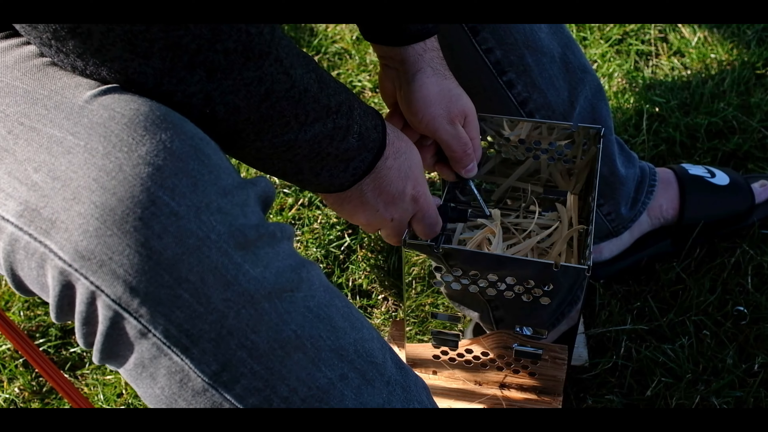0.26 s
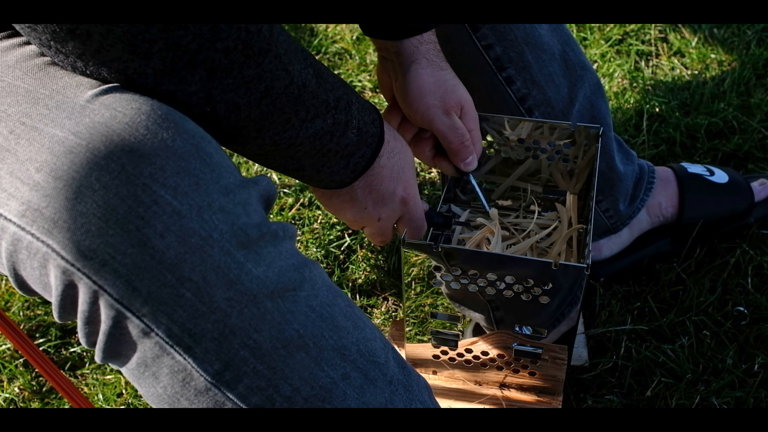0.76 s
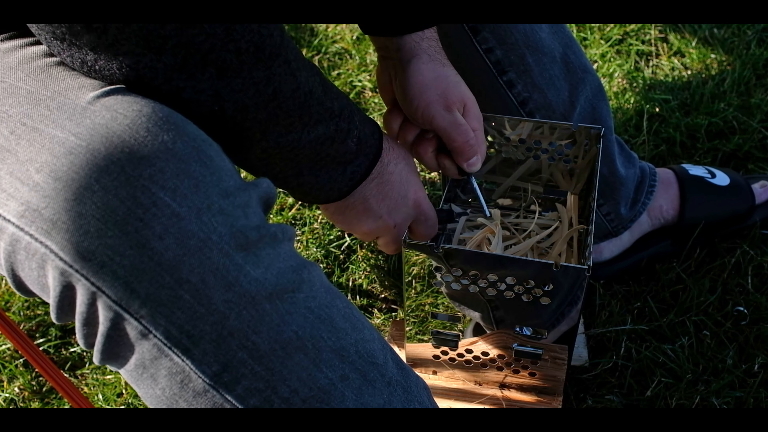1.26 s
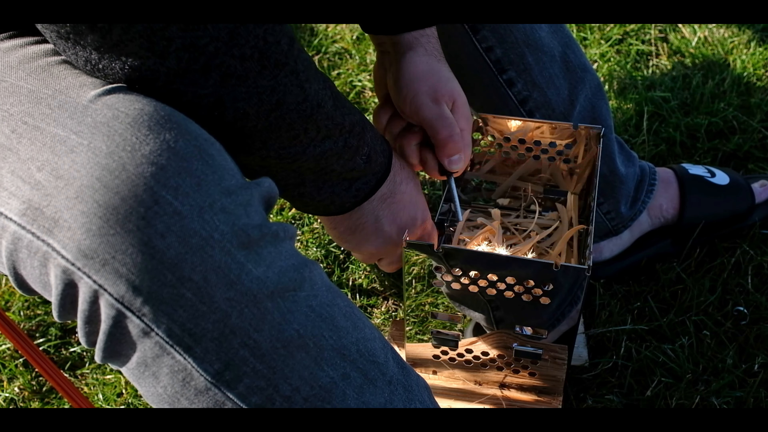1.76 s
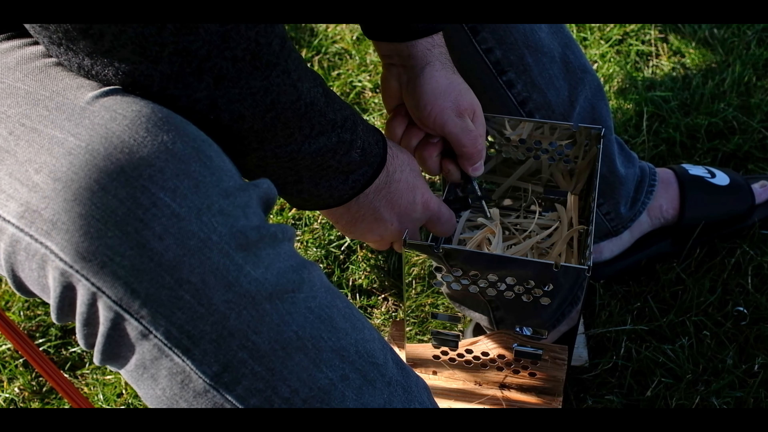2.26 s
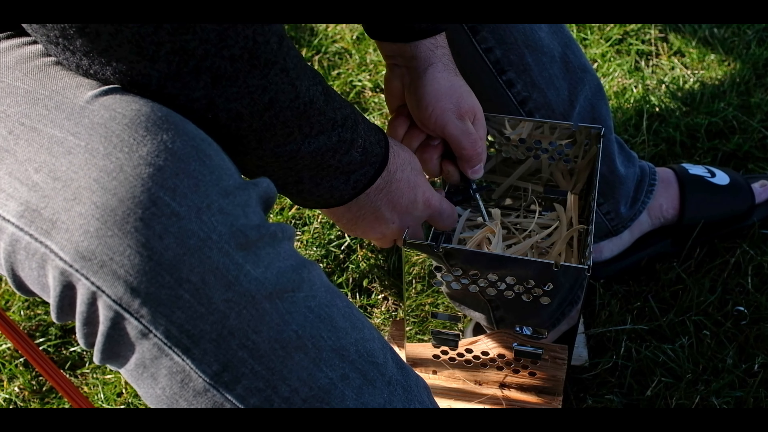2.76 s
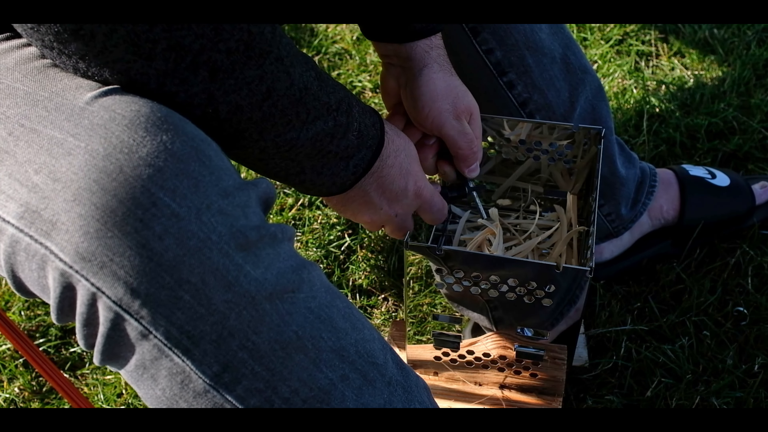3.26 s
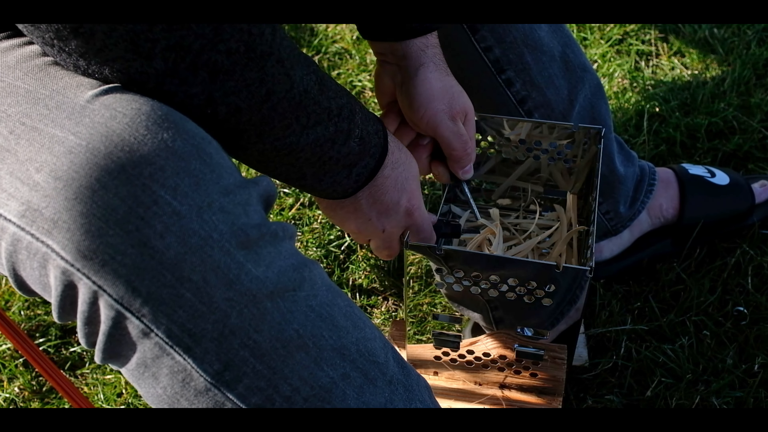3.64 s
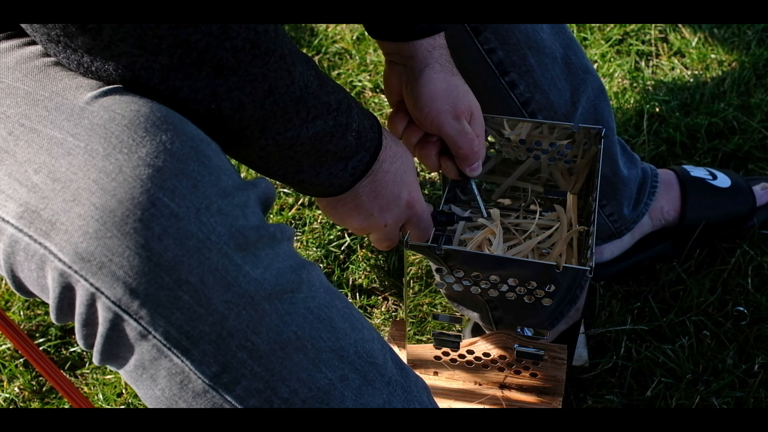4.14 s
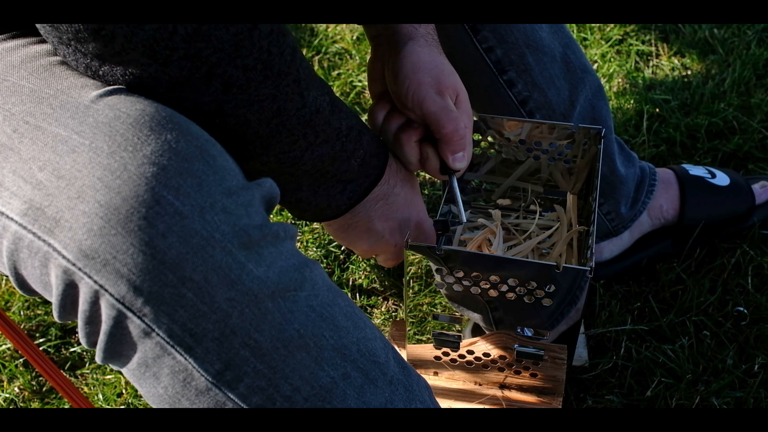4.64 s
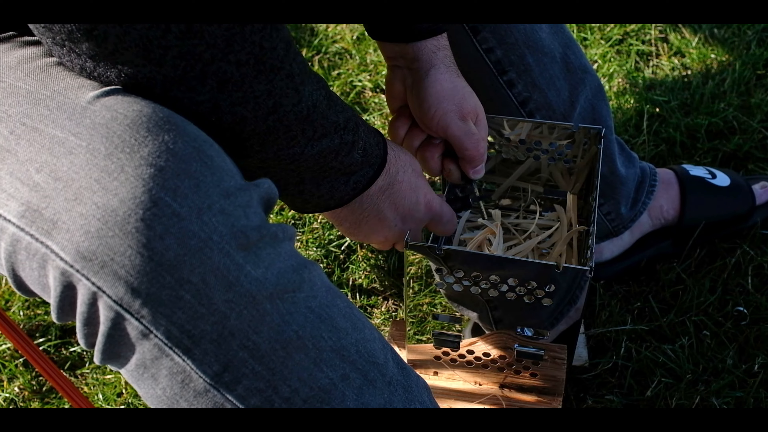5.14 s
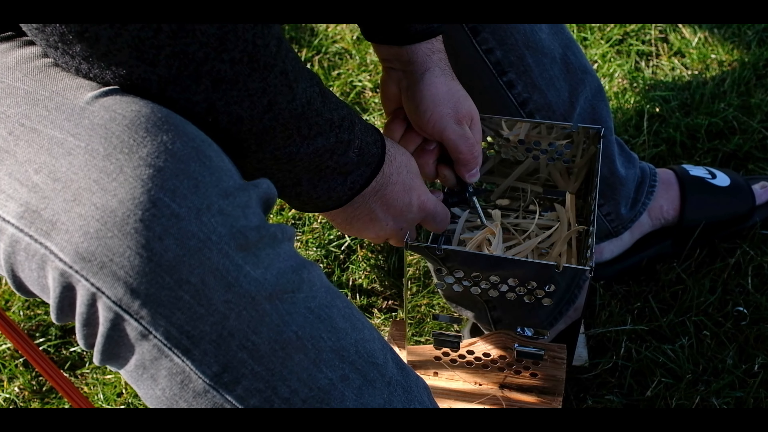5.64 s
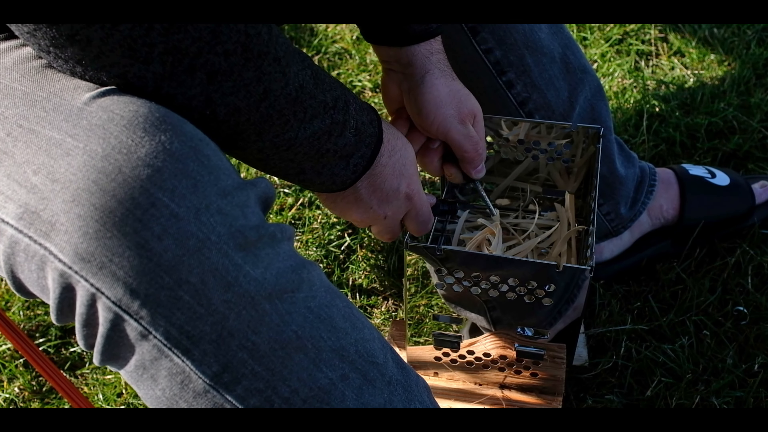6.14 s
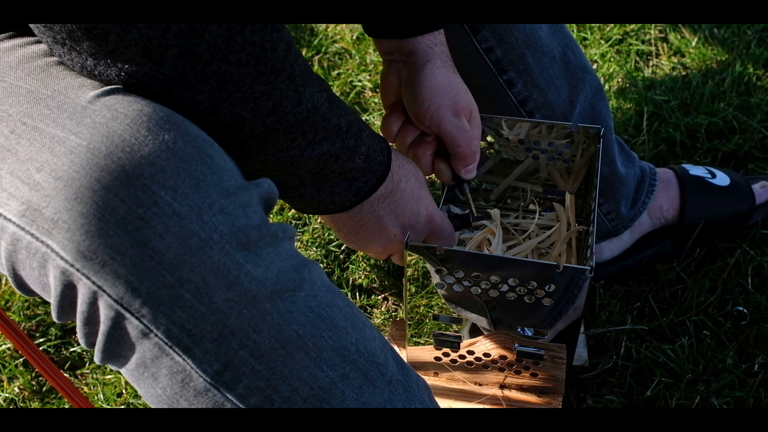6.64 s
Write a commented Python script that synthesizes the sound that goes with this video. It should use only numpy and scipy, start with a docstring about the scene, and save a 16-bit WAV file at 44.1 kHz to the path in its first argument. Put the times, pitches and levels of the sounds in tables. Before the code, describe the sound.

Gusty wind rumbles deep against the microphone in an open grassy place with faint distant sea. Nearby, hard steel scrapes down a rod in quick, bright, gritty strokes, each led by a small squeak and crack and followed by dry rustling. The striker clicks back onto the rod before the next stroke. Occasional short fizzing bursts sound boxy and metallic. At the very end a muffled thump gives way to fuller airy rush.

```python
"""Wind rumbles over a breezy field as a steel striker scrapes down a ferro rod in a sheet-steel camp stove.
In each stroke the edge skates, squeaks, bites with a crack and rasps off: stick-slip friction and fracture.
Cloth and tinder rustle, the striker clicks back onto the rod, and some spark showers crackle in the firebox.
Its walls ring faintly when knocked. One wind strength drives buffeting, eddies and a rope's note;
near the end a soft thump opens a broader rush of wind and sea."""
import sys
import numpy as np
from scipy import signal
from scipy.fft import rfft, irfft
from scipy.io import wavfile
from scipy.ndimage import uniform_filter1d

SR = 44100
rng = np.random.default_rng(int(sys.argv[2]) if len(sys.argv) > 2 else 0)


def dump(signal):
    """Clip the signal to [-1, 1] and save it as 16-bit WAV at the path in sys.argv[1]."""
    limited = np.clip(np.atleast_2d(signal).T, -1, 1)
    pcm = np.round(limited * 32767).astype(np.int16)
    wavfile.write(sys.argv[1], SR, pcm)


N = 304290
T = np.arange(N) / SR  # time, s


def undb(db):
    """Logarithmic level: decibels to amplitude gain."""
    return 10 ** (np.asarray(db) / 20)


def unit(x):
    """Power normalisation: scale to rms 1."""
    return x / np.sqrt(np.mean(x ** 2))


def white():
    """White noise: equal mean power at every frequency, rms 1."""
    return rng.standard_normal(N)


def colour(x, points, size=32768):
    """Minimum-phase filtering to a (f/Hz, level/dB) shape; white noise keeps its power."""
    hz, db = np.transpose(points)
    log_f = np.log(np.fft.rfftfreq(size, 1 / SR) + 1)
    gain = unit(undb(np.interp(log_f, np.log(hz), db)))
    # folding the cepstrum onto positive time makes the response causal
    cepstrum = irfft(np.log(gain))
    cepstrum[1:size // 2] *= 2
    cepstrum[size // 2 + 1:] = 0
    response = irfft(np.exp(rfft(cepstrum)))
    return signal.oaconvolve(x, response)[:N]


def resonate(x, modes):
    """Modal resonance: (f/Hz, width/Hz, level/dB) modes decay at pi * width; white noise keeps its power."""
    t = T[:min(len(x), SR // 10)]
    response = 0
    for hz, width, db in modes:
        decay = np.exp(-np.pi * width * t)
        response = response + undb(db) * width * decay * np.cos(2 * np.pi * hz * t)
    return signal.fftconvolve(x, response / np.linalg.norm(response))[:len(x)]


def walk(rate):
    """Slow modulation: random knots at this rate per second, joined by lines, rms 1."""
    knots = np.arange(int(N / SR * rate) + 2) / rate
    return unit(np.interp(T, knots, rng.standard_normal(len(knots))))


def grains(rate, spread_db):
    """Shot noise: tiny fractures at random moments, of uneven size and either sign, rms 1."""
    fractures = rng.random(N) < rate / SR
    signs = rng.choice([-1, 1], N)
    return unit(fractures * signs * undb(spread_db * rng.standard_normal(N)))


def contacts(times, levels_db, decay_s, modes, detune=0.041):
    """Impact excitation: a decaying burst of micro-impacts rings modes that shift with the grip."""
    out, size = np.zeros(N + SR), 2048
    t = T[:size]
    for s, db in zip(times, levels_db):
        chance = rng.standard_normal(size)
        # the last draws, nearly silent in the burst, set the shift of each mode
        gripped = [(hz + detune * min(hz, 4000) * shift, width, level)
                   for (hz, width, level), shift in zip(modes, chance[::-1])]
        hit = resonate(chance * np.exp(-t / decay_s), gripped)
        loudest = np.sqrt(uniform_filter1d(hit ** 2, size=132).max())  # rms of the loudest 3 ms
        start = int(s * SR)
        out[start:start + size] += undb(db) * hit / loudest
    return out[:N]


# strength of the wind: t/s, level/dB about its mean
WIND_STRENGTH = [(0.0, 9.5), (0.3, 10), (0.48, 3.0), (0.6, 8.0), (0.78, 1.5), (1.03, -2.5), (1.3, -1.0),
                 (1.65, 0.5), (2.08, 5.5), (2.5, 1), (3.35, 1.5), (3.7, -2.5), (4.4, -2.5), (5.05, -8.0),
                 (5.68, -5.5), (6.17, 4.5), (6.5, 3.5), (6.9, -3.5)]


def wind_strength():
    """Common drive: the strength of the wind at each moment, in dB about its mean."""
    return np.interp(T, *np.transpose(WIND_STRENGTH))


# spectral shapes of the wind, lowest first: f/Hz, level/dB per Hz
BUFFET_SHAPE = [(8, -12.5), (15, 5), (27, 2), (40, -5.5), (56, -12.5), (75, -27), (130, -51), (1000, -130)]
THRUM_SHAPE = [(35, -15), (60, 1.5), (80, -1), (110, -10.5), (160, -20), (320, -41.5), (2000, -110)]
EDDY_SHAPE = [(50, -6.5), (110, 0), (160, -2.5), (290, -9.5), (430, -12.5), (700, -24.5), (1100, -32),
              (2000, -46), (5000, -57)]
# each layer: level in the mean wind (dB), dB per dB of wind
BUFFET_DB, BUFFET_SLOPE = -15.5, 1.08
THRUM_DB, THRUM_SLOPE = -33.5, 1.16
EDDY_DB, EDDY_SLOPE = -41.5, 0.8


def wind(flurry_db=1.5, flurries_per_s=9):
    """Turbulent pressure: gusts buffet the microphone; finer eddies thrum and flutter above the rumble."""
    strength = wind_strength()
    gusts = strength + flurry_db * walk(flurries_per_s)
    rumble = colour(white(), BUFFET_SHAPE)
    rumble /= np.sqrt(uniform_filter1d(rumble ** 2, size=9000))  # the gusts alone set its slow swell
    buffet = rumble * undb(BUFFET_DB + BUFFET_SLOPE * gusts)
    thrum = colour(white(), THRUM_SHAPE) * undb(THRUM_DB + THRUM_SLOPE * gusts)
    eddies = colour(white(), EDDY_SHAPE) * undb(EDDY_DB + EDDY_SLOPE * strength + 1.2 * walk(25))
    return buffet + thrum + eddies


ROPE_DB, ROPE_SLOPE = -58.5, 0.71  # drive in the mean wind (dB), dB per dB of wind
ROPE_HZ, ROPE_CLIMB = 827, .45  # centre note in the mean wind (Hz), power law of its climb
ROPE_RANGE_DB = 6  # the range of wind that the note follows


def rope():
    """Vortex shedding: a guy rope's faint, breathy, wavering note climbs and swells with the wind."""
    drive_db = ROPE_RANGE_DB * np.tanh(wind_strength() / ROPE_RANGE_DB)
    hz = ROPE_HZ * undb(ROPE_CLIMB * drive_db) * (1 + .035 * walk(12))
    flutter = colour(white(), [(25, 0.5), (70, -9.5), (200, -25.5), (2000, -86.5)])
    note = np.cos(2 * np.pi * np.cumsum(hz) / SR)
    return flutter * undb(ROPE_DB + ROPE_SLOPE * drive_db) * note


# distant sea and wind in the grass: f/Hz, level/dB per Hz
FIELD_SHAPE = [(60, -1.5), (250, 1.5), (500, -13), (800, -14), (1400, -16), (2200, -22), (4000, -29),
               (5400, -28), (6200, -29), (7500, -30.5), (11000, -40), (15000, -38.5)]


def field():
    """Distributed sources: distant sea and wind in the grass merge into slowly varying noise."""
    return colour(white(), FIELD_SHAPE) * undb(-49.5 + .7 * walk(2.94))


# strokes down the rod: start t/s, squeak t/s, bite t/s, end t/s,
# then relative rasp level/dB, edge ring level/dB, squeak level/dB, bite crack level/dB
STROKES_DOWN_ROD = [(.006, .006, .007, .031, -29.5, -30, -36, -27),
                    (.548, .567, .589, .69, -34, -36, -29, -24),
                    (1.145, 1.176, 1.1935, 1.243, -29.5, -30, -17, -24),
                    (1.729, 1.754, 1.773, 1.83, -32, -32, -21, -23),
                    (1.818, 1.826, 1.828, 1.878, -40, -39, -30, -25),
                    (2.279, 2.2824, 2.3055, 2.339, -29.5, -30, -18, -19.5),
                    (2.815, 2.829, 2.862, 2.972, -31.5, -33, -18, -22),
                    (3.403, 3.437, 3.447, 3.499, -29, -32, -24, -19),
                    (3.995, 3.9983, 4.032, 4.088, -29, -31, -17, -24),
                    (4.565, 4.6058, 4.614, 4.661, -30, -31, -23, -23),
                    (5.161, 5.19, 5.202, 5.3, -32.5, -33, -32, -21),
                    (5.755, 5.777, 5.802, 5.832, -31, -31, -24, -27),
                    (6.578, 6.668, 6.6855, 6.698, -44.5, -47, -30, -23.5)]
# striker and rod ringing under a scrape: f/Hz, width/Hz, level/dB
EDGE_MODES = [(5900, 290, -11), (7850, 440, -9.5), (8900, 500, -11), (12570, 170, 9), (13700, 490, -5.5),
              (15200, 700, -20)]
# spectral shape of the shaving noise: f/Hz, level/dB per Hz
RASP_SHAPE = [(150, -10.5), (350, -8), (700, 1), (1000, -1), (1500, -0.5), (2000, -3), (3200, -1),
              (5700, -1), (7000, -3.5), (8400, 4.5), (10200, -8.5), (13000, -12), (15000, -9)]
SKATE_DB, EASE_DB = 21, 13  # the rasp is this much weaker at the start and at the end of a stroke
RING_IN_DB, RING_OUT_DB = 11, 23  # the ring is this much weaker at the start and at the end
DIG_S, RELEASE_S = .011, .004  # from the bite to full depth; the edge leaves the rod
CHATTER_PER_S, CHATTER_DB = 130, 4.5  # the skating edge hops on the rod
GRIP_SHIFT_HZ, GRIP_SHIFTS_PER_S = 200.3, 110  # rms wander of the ring as the edge travels and the grip changes


def scrapes():
    """Stick-slip friction: the edge skates and chatters, then bites and rasps, and eases off."""
    rasp, ring = np.zeros(N), np.zeros(N)
    hops = CHATTER_DB * np.clip(walk(CHATTER_PER_S), -2, 1)
    for start, squeak, bite, end, rasp_db, ring_db, _, _ in STROKES_DOWN_ROD:
        span = (T >= start) & (T < end + 10 * RELEASE_S)
        t, deepest = T[span], min(bite + DIG_S, end)
        release = np.exp(-np.maximum(t - end, 0) / RELEASE_S)
        touching = release * undb(hops[span] * (t < bite))
        rasp_course = np.interp(t, [start, deepest, end], [-SKATE_DB, 0, -EASE_DB])
        ring_course = np.interp(t, [start, squeak, deepest, end], [-RING_IN_DB, 0, -6, -RING_OUT_DB])
        rasp[span] += touching * undb(rasp_db + rasp_course)
        ring[span] += touching * undb(ring_db + ring_course)
    stick_slip = np.tanh(walk(210))  # the edge either grips or glides
    shaving = colour(grains(9000, 4.3), RASP_SHAPE) * rasp * undb(4.7 * stick_slip + 2.5)
    singing = resonate(grains(7000, 4.3) * ring * undb(5.2 * stick_slip - 4.0), EDGE_MODES)
    # turning the analytic signal shifts every partial by the same number of Hz
    shift_hz = GRIP_SHIFT_HZ * walk(GRIP_SHIFTS_PER_S)
    wander = np.exp(2j * np.pi * np.cumsum(shift_hz) / SR)
    return shaving + np.real(signal.hilbert(singing) * wander)


def slips(landing_db=-6, squeak_db=-8):
    """Transient excitation: the edge rings as it lands on the rod and again as it slips by the bite."""
    starts, squeaks, _, _, _, ring_db, slip_db, _ = np.transpose(STROKES_DOWN_ROD)
    landings = contacts(starts, ring_db + landing_db, 0.0025, EDGE_MODES)
    return landings + contacts(squeaks, slip_db + squeak_db, 0.0028, EDGE_MODES)


POP_DB, POP_RISE_S = 3.5, 0.0011  # a flare with this rise pops this far over its set level; slower ones pop less


def chips():
    """Brittle fracture: flakes break off with a dry crack at each bite and as a shower catches."""
    bites = [(bite, db) for _, _, bite, *_, db in STROKES_DOWN_ROD]
    pops = [(s, db + POP_DB - 20 * np.log10(rise / POP_RISE_S)) for s, rise, _, db, _, _ in SPARK_FLARES]
    times, chip_db = np.transpose(bites + pops)
    # f/Hz, width/Hz, level/dB
    modes = [(2350, 540, -4), (3720, 1200, -4), (5660, 530, 3.5), (8840, 310, 2.5), (13100, 2100, -22)]
    return contacts(times, chip_db - .5, 0.00067, modes)


def stove(x, scatter_s=0.0061):
    """Multiple scattering: sound bounces briefly between the stove and the legs, as decaying noise."""
    response = rng.standard_normal(SR) * np.exp(-T[:SR] / scatter_s) * (T[:SR] > .001)
    scattered = signal.fftconvolve(x, response / np.linalg.norm(response))[:N]
    return x + undb(-10.0) * scattered


# hands and sleeves brush the tinder: start t/s, end t/s, relative level/dB
TINDER_RUSTLES = [(.31, 0.53, -59), (1.362, 1.46, -54), (2.11, 2.278, -56.5), (3.55, 3.665, -51),
                  (3.954, 3.97, -46), (4.118, 4.134, -49), (4.914, 4.983, -46), (6.22, 6.257, -50.5)]
# spectral shape of cloth and shavings: f/Hz, level/dB per Hz
BRUSH_SHAPE = [(400, 6), (1300, 7), (2500, -2.5), (6000, -5.5), (9000, -9), (11000, -22), (16000, -26)]
FOLLOW_S, FOLLOW_DB = .09, -55.5  # after every stroke the hand runs on through the tinder


def rustles():
    """Crackling noise: cloth and dry shavings crinkle after each stroke and as the hands shift."""
    follow_through = [(end, end + FOLLOW_S, FOLLOW_DB) for _, _, _, end, *_ in STROKES_DOWN_ROD]
    motion = np.zeros(N)
    for start, end, db in TINDER_RUSTLES + follow_through:
        motion += undb(db) * ((T > start) & (T < end))
    motion = uniform_filter1d(motion, size=400)
    crinkle = grains(4000, 3.9) * motion * undb(4.0 * walk(70) - 3.0)
    return colour(crinkle, BRUSH_SHAPE)


# the striker is set back on the rod, a dull touch and then a bright click as it seats:
# seating t/s, lead of the touch t/s, then relative touch level/dB, click level/dB, edge ring level/dB
STRIKER_TAPS = [(.1, 0.0017, -37.5, -40, -50), (.381, 0.015, -40, -28, -30), (.5076, 0.05, -39, -41, -40),
                (.9787, 0.041, -27, -32, -40), (1.3288, .002, -46, -40, -39),
                (1.564, 0.0043, -33.5, -30, -18), (2.1335, 0.0039, -31.5, -30, -28),
                (2.178, .005, -40, -40, -42), (2.658, .026, -23, -22, -28), (3.271, .029, -29.5, -20, -20),
                (3.8003, 0.0021, -24.5, -22.5, -17.5), (4.4206, 0.031, -30.5, -24.5, -25),
                (5, .026, -30.5, -27, -23), (5.5776, .023, -25, -30, -24), (6.002, .002, -43, -34, -24),
                (6.0448, 0.0053, -34, -33, -20), (6.3206, 0.026, -27, -26, -16),
                (6.8792, .002, -44, -29, -38)]
# striker and rod under a tap: f/Hz, width/Hz, level/dB
KNOCK_MODES = [(1310, 270, -3), (2100, 380, 3.5), (3230, 360, -6.5), (4490, 380, -4), (5380, 770, 1.5),
               (8160, 290, 0), (9550, 600, -43)]
TOUCH_RING_DB = -30  # table level of the first touch's edge ring, relative to its knock


def taps():
    """Damped impact: steel meets rod twice, each a knock and a high ring that the fingers damp at once."""
    touches = [(s - lead, db, db + TOUCH_RING_DB) for s, lead, db, _, _ in STRIKER_TAPS]
    clicks = [(s, db, ring) for s, _, _, db, ring in STRIKER_TAPS]
    times, knock_db, ring_db = np.transpose(touches + clicks)
    knocks = contacts(times, knock_db - 7.5, 0.0022, KNOCK_MODES)
    rings = contacts(times, ring_db - 9.5, 0.0012, [(12540, 520, 10), (13300, 810, -8)])
    return knocks + rings


# spark showers that catch: t/s, rise t/s, full burn t/s, relative level/dB, fade rate/(dB/s),
# place across the firebox (0-1)
SPARK_FLARES = [(0.6172, .001, .010, -21.5, 320, .58), (0.734, .020, .012, -29, 310, .7),
                (2.861, .004, .050, -22, 370, .7), (5.2285, .001, .032, -23.5, 370, .33),
                (5.801, .003, .016, -31.5, 300, .7), (5.852, .012, .014, -29.5, 400, .75)]
# air in the firebox: f/Hz, width/Hz, level/dB
BOX_MODES = [(590, 55, -6), (1090, 40, 5), (1390, 80, -3), (1485, 55, 3), (1585, 45, -3), (1820, 70, -10),
             (2650, 70, -7), (3340, 130, -7), (4040, 170, -9), (4810, 80, -5), (4980, 70, -7),
             (5510, 90, -8), (5800, 80, -7), (8250, 200, -6)]
# spectral shape of the burning flakes: f/Hz, level/dB per Hz
BURN_SHAPE = [(150, -10), (350, -1.5), (620, -0.5), (850, 0), (1100, 3), (1450, 8), (1800, -2), (2300, -2),
              (3200, 1), (5300, 0), (7000, -7.5), (8400, -2), (10200, -19.5), (14500, -21)]


def sparks(node_db=3):
    """Cavity excitation: burning flakes crackle and die; their place weights the firebox modes."""
    fizz = grains(12000, 4.4) * undb(1.4 * walk(220))
    direct, boxed = np.zeros(N), np.zeros(N)
    for s, rise, hold, db, fade, place in SPARK_FLARES:
        span = slice(int(s * SR), int(s * SR) + SR // 3)
        age = T[span] - s
        fading_db = db - fade * np.maximum(age - rise - hold, 0)
        crackle = fizz[span] * np.clip(age / rise, 0, 1) * undb(fading_db)
        modes = [(hz, width, gain + node_db * np.cos(k * np.pi * place))
                 for k, (hz, width, gain) in enumerate(BOX_MODES)]
        direct[span] += crackle
        boxed[span] += resonate(crackle, modes)
    return undb(-3) * colour(direct, BURN_SHAPE) + undb(-9.5) * boxed


# the hand runs into the stove: t/s, relative level/dB, place (0 = rim to 1 = side panel)
STOVE_KNOCKS = [(2.905, -44, 0.2), (5.256, -46.5, 1), (5.873, -54, 0.087)]
# steel walls of the stove: f/Hz, time to decay by 60 dB t/s, level/dB struck at the rim, level/dB at the side
WALL_MODES = [(1086, .36, -24, 6), (1356, 0.22, 20, -4), (1585, 0.45, 6, 0), (2568, 0.35, 7, -12),
              (3110, 1, 3, -24), (3300, .38, -11, 3), (3460, .27, -5, -12), (3700, .42, 1, -8),
              (5085, .3, -16, -6), (5216, .24, -9, -7), (5353, 0.62, -15, -18), (6621, .38, -13, -21)]


def walls(push_s=.02):
    """Plate vibration: thin steel walls ring faintly; the place of the blow sets each mode's share."""
    out, t = np.zeros(N + SR), T[:SR]
    for s, db, place in STOVE_KNOCKS:
        ring = np.zeros(SR)
        for hz, t60, rim, side in WALL_MODES:
            struck_db = rim + place * (side - rim)
            ring += undb(struck_db - 60 * t / t60) * np.sin(2 * np.pi * hz * t)
        start = int(s * SR)
        out[start:start + SR] += undb(db) * np.minimum(t / push_s, 1) * ring
    return out[:N]


# spectral shapes of the soft thump and the broad rush: f/Hz, level/dB per Hz
THUMP_SHAPE = [(60, -15), (130, 0), (200, -2), (400, -23), (2000, -94)]
RUSH_SHAPE = [(80, 9), (300, -3), (700, -0.5), (1500, -3), (2500, -14), (4000, -12), (5200, -27),
              (9000, -31), (16000, -32)]
RUSH_S = 6.756  # a broader rush of wind and sea sets in


def open_air(thump_db=-28, thump_s=0.031):
    """Broadband noise: a soft, exponentially dying thump opens a steady rush of wind and sea."""
    since = np.maximum(T - RUSH_S, 0)
    thump = colour(white(), THUMP_SHAPE) * undb(thump_db) * np.exp(-since / thump_s)
    rush = colour(white(), RUSH_SHAPE) * undb(-42)
    return (thump + rush) * np.minimum(since / 0.0044, 1)


def scene():
    """Superposition: tools and sparks in the stove, under the wind."""
    striking = scrapes() + slips() + chips() + rustles() + taps() + sparks()
    outdoors = wind() + rope() + field() + open_air()
    return (outdoors + stove(striking) + walls())[None]


TOP_HZ = 15850  # upper edge of the passband


def record(dry):
    """Clipping and band-limiting: peaks are clipped at full scale, then the top is cut steeply."""
    low_pass = signal.ellip(10, .2, 70, TOP_HZ, fs=SR, output="sos")
    return signal.sosfilt(low_pass, np.clip(dry, -1, 1))


dry = scene()
out = record(dry)
dump(out)
```